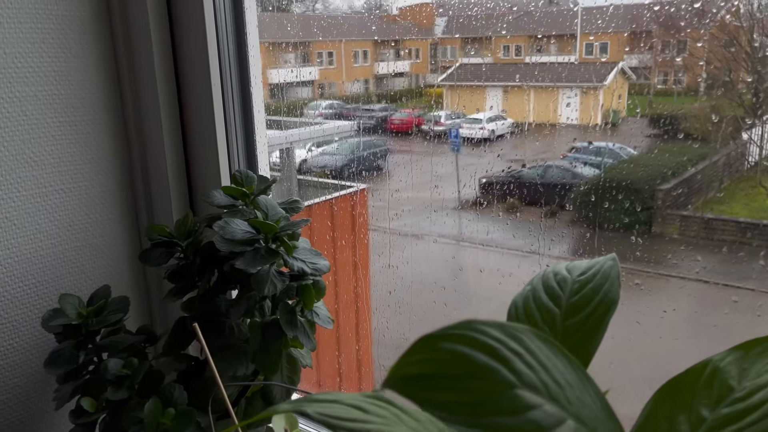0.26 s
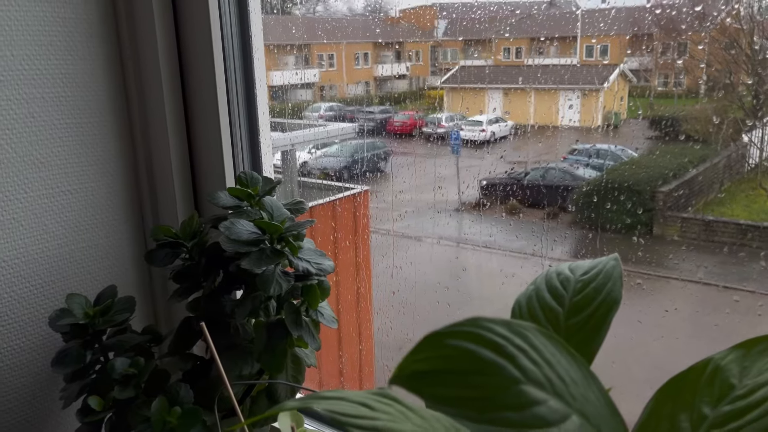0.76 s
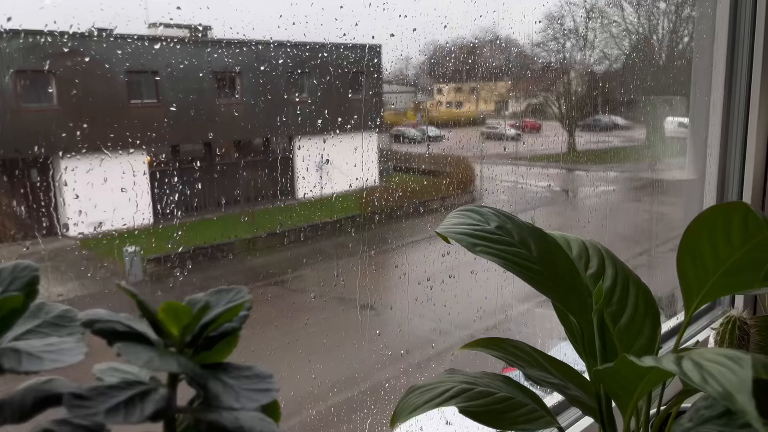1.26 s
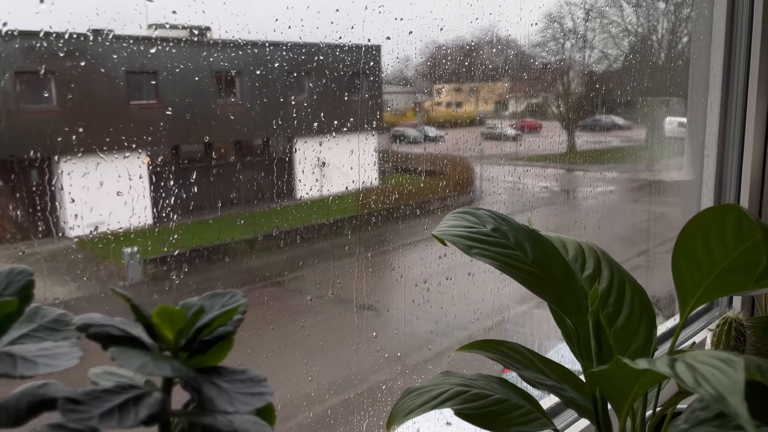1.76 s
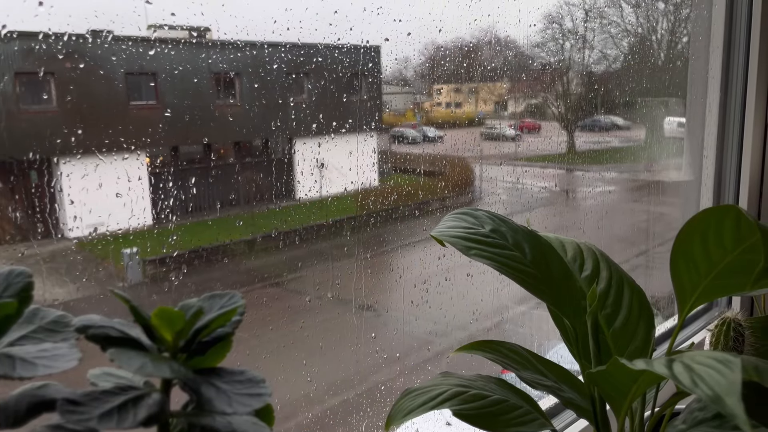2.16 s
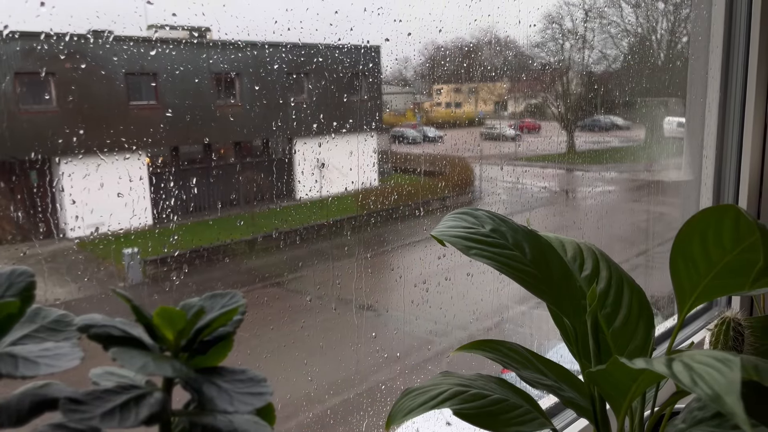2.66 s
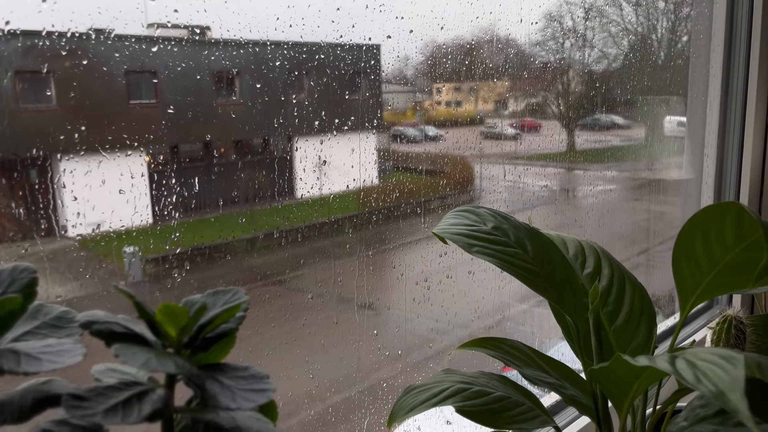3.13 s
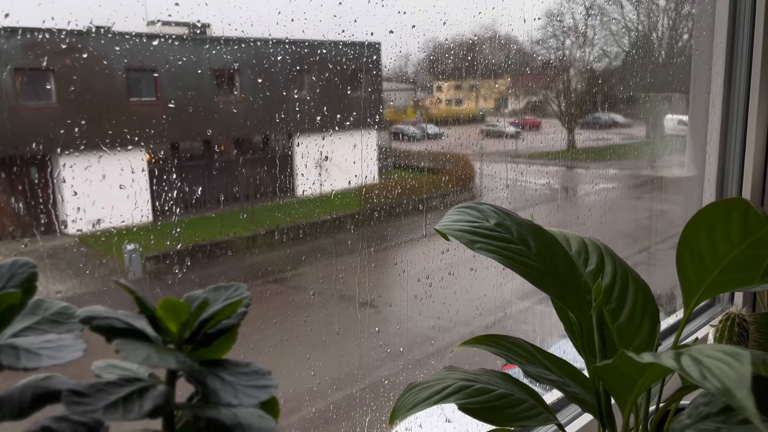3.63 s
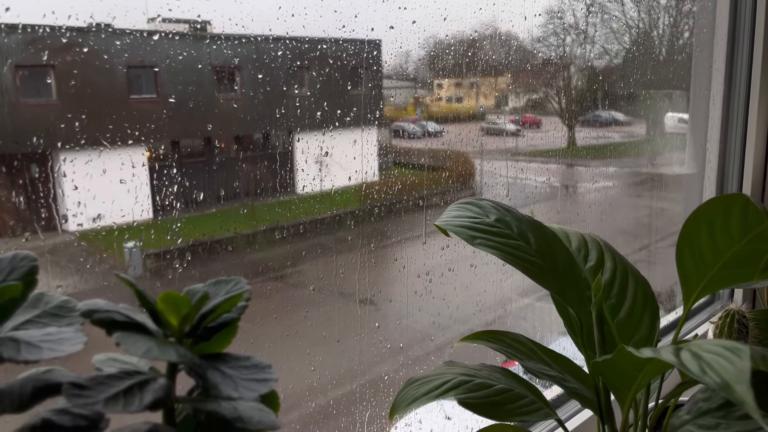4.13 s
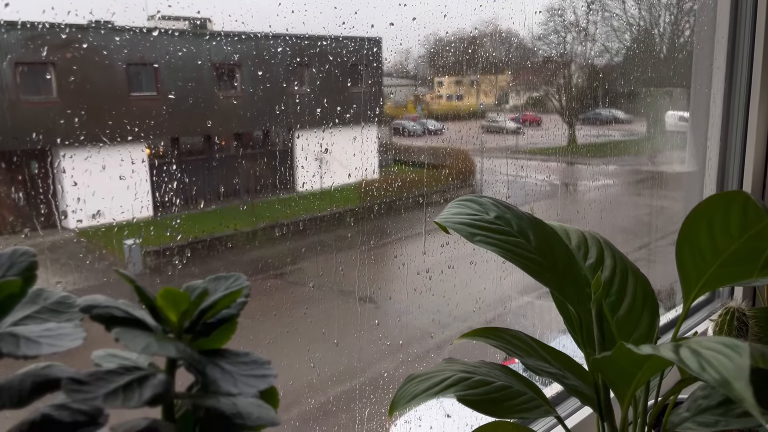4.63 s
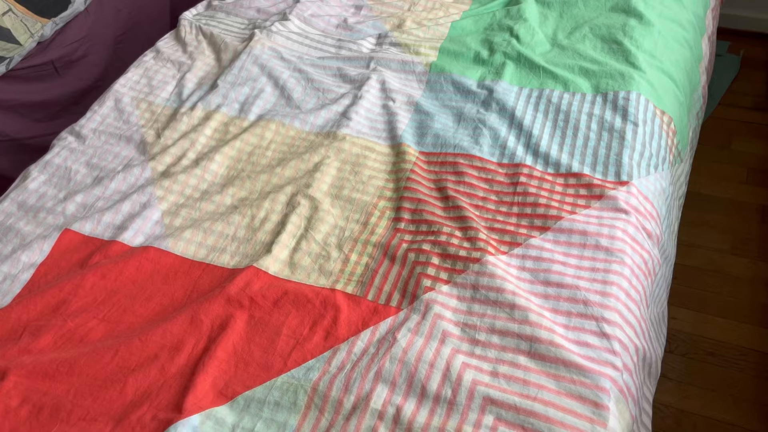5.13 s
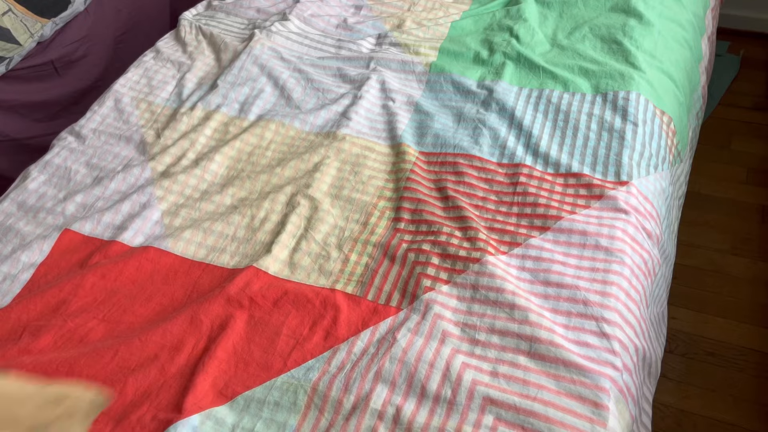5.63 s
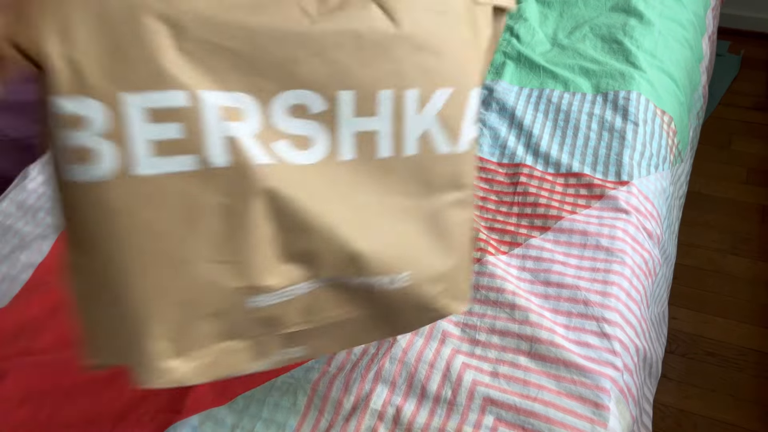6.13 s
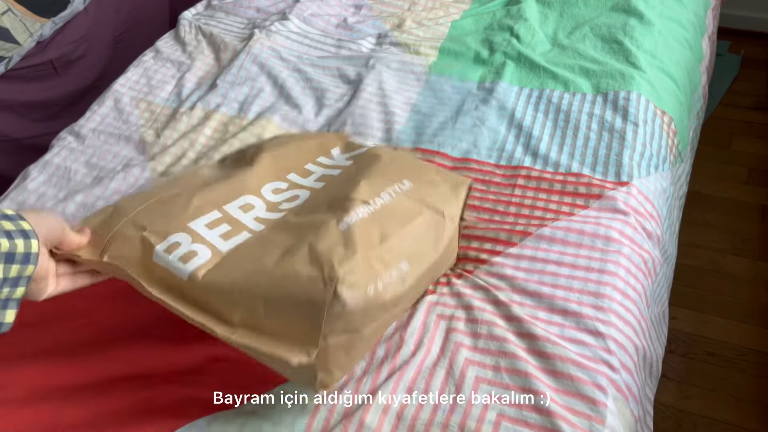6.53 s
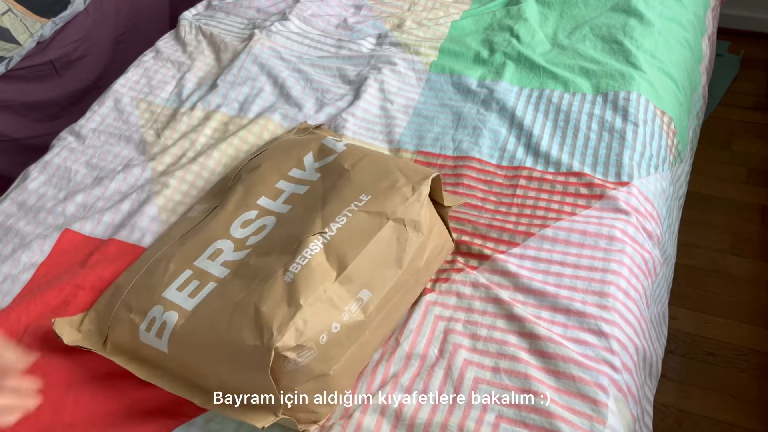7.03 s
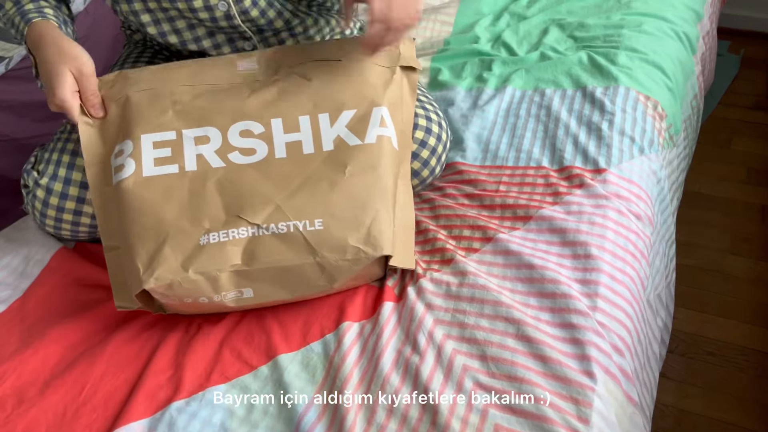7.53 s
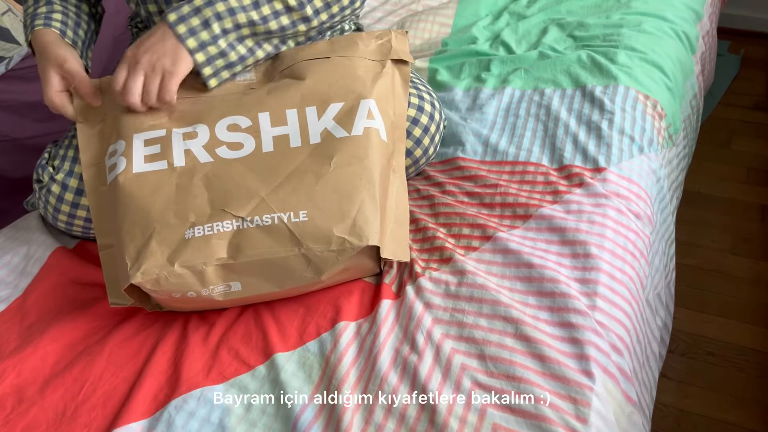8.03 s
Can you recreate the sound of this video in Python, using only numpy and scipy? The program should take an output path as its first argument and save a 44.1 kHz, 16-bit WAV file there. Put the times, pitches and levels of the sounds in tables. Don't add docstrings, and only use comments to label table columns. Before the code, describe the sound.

Indoors by a window, light drops tap the glass at uneven intervals, each a small tick with a dull knock and brief ring, over faint draught whistles, distant rain and low rumble. After about five seconds the rain gives way to a quiet bedroom, where a stiff paper parcel rustles, lands with a loud crackling burst, and is felt over with crisp pops. Close stereo microphone.

```python
import sys
import numpy as np
from scipy import signal
from scipy.fft import next_fast_len
from scipy.io import wavfile

SR = 44100
rng = np.random.default_rng(int(sys.argv[2]) if len(sys.argv) > 2 else 0)


def natural_amplitude(level_db):
    exponent = np.asarray(level_db, float) / 20
    return 10 ** exponent


def bounce(signal):
    frames = np.transpose(np.atleast_2d(signal))
    limited = np.clip(frames, -1, 1)
    pcm = np.round(limited * 32767).astype(np.int16)
    wavfile.write(sys.argv[1], SR, pcm)


N = 365148
SLOW = 40
SCENE_CHANGE_S = 7.295
IN_BEDROOM = slice(int(4.7 * SR), N)

# (time [s], peak [dB], bright patch [Hz], boom re peak [dB], boom pitch [Hz])
DROPS = [(0.413, -54, 2150, -19, 238), (0.446, -74, 2620, 25, 230), (0.55, -39, 1860, -8, 577),
         (0.758, -56, 1800, -20, 307), (0.856, -57, 1190, 0, 520), (0.962, -64, 870, 5, 500),
         (1.165, -74, 802, 11, 202), (1.519, -66, 1850, -16, 293), (1.64, -68, 1500, -5, 300),
         (1.727, -70, 1440, -8, 300), (1.846, -52, 990, 2, 554), (1.958, -62, 880, -4, 288),
         (2.103, -70, 1020, -5, 300), (2.422, -70, 1670, -8, 300), (2.464, -70, 1420, -8, 300),
         (2.674, -47.5, 1120, -1, 540), (3.041, -50, 1020, 4, 450), (3.098, -46.5, 1040, -3, 450),
         (3.218, -49.5, 891, 3.5, 442), (3.312, -49, 990, -1.5, 480), (3.519, -47, 961, -3, 445),
         (3.618, -68, 1740, -8, 300), (3.743, -66, 3060, -10, 300), (3.781, -43.5, 3700, -9.5, 456),
         (4.059, -63, 1670, -4, 203), (4.102, -69, 3610, -10, 300), (4.231, -42, 3940, -7.5, 232),
         (4.518, -47, 1920, 1, 480), (4.639, -63, 1120, -19, 223), (4.707, -70, 834, 11, 220),
         (4.804, -58, 850, 11.5, 325), (4.855, -43.5, 1380, -8, 304)]


def rms_one(x):
    return x / np.sqrt(np.mean(x ** 2) + 1e-20)


def at_hz(points, hz):
    points = np.array(points)
    return np.interp(np.log(hz), np.log(points[:, 0]), points[:, 1])


def hump(hz, centre_hz, db_per_octave):
    return natural_amplitude(-db_per_octave * np.abs(np.log2(hz / centre_hz)))


def notch(x, hz, width_hz):
    edges = [hz - width_hz / 2, hz + width_hz / 2]
    return signal.sosfilt(signal.butter(2, edges, "bandstop", fs=SR, output="sos"), x)


def drift(rate_hz):
    r = np.exp(-2 * np.pi * rate_hz * SLOW / SR)
    chance = rng.standard_normal(N // SLOW + 2002)
    settled = signal.lfilter([1], [1, -2 * r, r * r], chance)[2000:]
    return rms_one(settled)[:(N + SLOW - 1) // SLOW]


def full(slow):
    return np.interp(np.arange(N) / SLOW, np.arange(len(slow)), slow)


def peaked(s, db, rise_s, fall_s):
    t = np.arange(0, N, SLOW) / SR
    below_peak = np.maximum((s - t) / rise_s, (t - s) / fall_s)
    return natural_amplitude(2 * db - 20 * below_peak) * ((t < SCENE_CHANGE_S) == (s < SCENE_CHANGE_S))


def pair(alike):
    mid, own = rng.standard_normal((2, N))
    turned = -np.imag(signal.hilbert(mid, next_fast_len(N)))[:N]
    alike = np.clip(alike, 0, 1)
    return np.array([mid, alike * turned + np.sqrt(1 - alike ** 2) * own])


def bank(source, level, span=slice(0, None)):
    # (frequency [Hz], level [dB])
    width = [(60, -21), (200, -17), (400, -6.5), (1300, 1.5), (2400, -5.5), (4400, -3.5), (8000, 0),
             (15000, 18)]
    edges_hz = 22 * 2 ** np.arange(0, 9.6, .4)
    centres_hz = np.sqrt(edges_hz[1:] * edges_hz[:-1])
    out = np.zeros((2, N))
    for k, hz in enumerate(centres_hz):
        band = signal.butter(2, edges_hz[k:k + 2], "band", fs=SR, output="sos")
        to_unit_rms = np.sqrt(SR / 2 / (edges_hz[k + 1] - edges_hz[k]))
        gain = to_unit_rms * natural_amplitude([[0], [at_hz(width, hz)]])
        driven = source[:, span] * level(hz)[span] * gain
        out[:, span] += (-1) ** k * signal.sosfilt(band, driven + 1e-18)
    return out


def bursts(times, band_db, t60, hz, slope, late_cycles, tail_db, tail_s):
    envelope, kicks, t = np.zeros(N), np.zeros(N), np.arange(SR // 4) / SR
    rings = np.clip(t60, .004, .3) * (hz / 2000) ** -slope
    for s, db, ring in zip(times, band_db, rings):
        at = int((s + late_cycles / hz) * SR)
        span = t[:min(int(ring * SR), N - at)]
        attack = np.minimum(span / (0.048 * ring), 1)
        envelope[at:at + len(span)] += natural_amplitude(db - 60 * span / ring) * attack
        kicks[at] += natural_amplitude(db + tail_db)
    return envelope + signal.lfilter([1], [1, -natural_amplitude(-60 / (tail_s * SR))], kicks)


def resonant_noise(rows):
    out = np.zeros((2, N))
    for start, end, hz, width_hz, db in rows:
        t = np.arange(int(max(start - .02, 0) * SR), int(end * SR))
        r = np.exp(-np.pi * width_hz / SR)
        poles = [1, -2 * r * np.cos(2 * np.pi * hz / SR), r * r]
        once = signal.lfilter([1], poles, rng.standard_normal((2, SR // 2)))
        tone = signal.lfilter([1], poles, once)[:, -len(t):]
        fade = np.clip(np.minimum(t / SR - start + 0.016, end - t / SR) / .03, 0, 1)
        out[:, t] += natural_amplitude(db) * rms_one(tone) * fade * [[1], [.7]]
    return out


def mode_pairs(rows, db_re, t60, upper_db):
    out, t = np.zeros(N), np.arange(SR // 10) / SR
    for s, db, low_hz, high_hz in rows:
        both = np.sin(2 * np.pi * low_hz * t) + natural_amplitude(upper_db) * np.sin(2 * np.pi * high_hz * t)
        decay = natural_amplitude(db + db_re - 60 * t / t60) * np.minimum(t / .0012, 1)
        out[int(s * SR):int(s * SR) + len(t)] += decay * both
    return out * [[1], [.4]]


def air():
    # (frequency [Hz], density [dB per Hz])
    spectrum = [(15, -33), (25, -11.5), (53, 1.5), (114, -4.5), (256, -15), (384, -19), (451, -23),
                (796, -31.5), (2550, -39), (4030, -43), (6920, -53), (7920, -53), (11900, -56),
                (16000, -60)]
    # (from [s], deep rumble [dB], upper rumble [dB], far rain and room air [dB])
    places = [
        (0, -70, -74, -77),
        (0.987, -69, -74.5, -81),
        (4.95, -65.5, -75, -85),
        (7.295, -66, -67, -85),
    ]
    # (peak time [s], over steady air [dB], centre [Hz], fall per 10 dB [s])
    swells = [(0.04, 9, 500, .09), (0.08, 8, 80, .1), (0.51, 10, 130, .15), (0.7, 5, 3000, .5),
              (1.1, 6, 80, .1), (1.92, 8, 110, .2), (2.4, 6, 1600, .3), (3.17, 10, 200, .35),
              (3.8, 5, 150, .1), (4.61, 13, 3500, .07), (4.6, 11, 220, .1), (4.87, 20, 7500, .06),
              (5.62, 18, 250, .15), (5.8, 8, 500, .15), (6.31, 25, 170, .07), (6.5, 10, 200, .2),
              (6.72, 14, 120, .1), (6.9, 14, 100, .1), (7.16, 21, 200, .05), (7.32, 13, 100, .12),
              (7.64, 12, 60, .1), (7.77, 11, 120, .12), (7.87, 6, 300, .06), (8.1, 8, 140, .08)]
    places, centre_hz = np.array(places), np.array(swells)[:, 2]
    place = np.searchsorted(places[1:, 0] * SR, np.arange(0, N, SLOW))
    shapes = np.array([peaked(s, db, .8 * fall_s, fall_s) for s, db, _, fall_s in swells])

    def level(hz):
        above = np.interp(np.log(hz), np.log([350, 800]), [0, 1])
        below = np.interp(np.log(hz), np.log([100, 160]), [1, 0])
        db = (places[:, 1:] - [25.5, 18, 10]) @ [below, 1 - below - above, above]
        swell = np.sqrt(1 + hump(hz, centre_hz, 5.5) ** 2 @ shapes)
        unrest_db = (1.5 + 2.5 * (1 - above)) * drift(4.9)
        return full(swell * natural_amplitude(db[place] + at_hz(spectrum, hz) + 10 * np.log10(hz) + unrest_db))
    return bank(pair(0.94), level)


def draught():
    # (from [s], to [s], pitch [Hz], width [Hz], level [dB])
    whistles = [(0, .3, 1040, 40, -94), (.15, .42, 1250, 30, -89), (0, .15, 1710, 50, -86),
                (.03, .35, 2083, 40, -90), (0, .22, 2615, 40, -89), (.2, .45, 3494, 35, -96),
                (.66, .86, 1750, 25, -82), (.89, .99, 1750, 25, -81), (.43, .55, 2083, 30, -89),
                (.43, .55, 2615, 30, -90), (0, .08, 3150, 300, -90), (.62, .99, 2940, 35, -90),
                (.67, .83, 3910, 120, -84), (.67, .8, 3850, 600, -82), (.85, .99, 3950, 120, -82),
                (.68, .82, 5670, 40, -92), (.6, .99, 2630, 30, -92), (.86, .99, 4330, 200, -83),
                (.6, 1, 5400, 800, -91)]
    return resonant_noise(whistles)


def drops():
    # (frequency [Hz], level [dB])
    pane = [(120, -1.5), (300, 18.5), (600, -6), (1200, -14.5), (2500, -7), (4500, -8.5), (7000, -6.5),
            (12000, 11)]
    # (frequency [Hz], level [dB], t60 [s])
    glass = [(266, -4, 0.7), (1319, -42, 0.21), (1800, 2.5, 0.22), (1916, -4, 0.072), (2184, -29.5, 0.28),
             (2570, -6, 0.52), (2660, -35, 0.26), (3050, -16, 0.14), (3725, -0.5, 0.11), (5000, 0, 0.04)]
    s, db, patch_hz, boom, boom_hz = np.transpose(DROPS)
    splash = -26 + .4 * (db + 48)

    def level(hz):
        splash_db = np.interp(np.log(hz), np.log([5000, 9000]), [0, 1]) * splash
        tick = (hz > 600) * natural_amplitude(splash_db + at_hz(pane, hz)) * (1 + 1.12 * hump(hz, patch_hz, 33))
        band_db = db - 17.5 + 20 * np.log10(tick + natural_amplitude(boom + 7.5) * hump(hz, boom_hz, 10.9))
        return bursts(s - .0015, band_db, np.full(len(s), .115), hz,
                      slope=0.27, late_cycles=2.4, tail_db=-16, tail_s=0.41)
    out = bank(pair(0.21), level, slice(0, int(5.4 * SR)))
    spot = np.clip(rng.normal(0, 2.2, (len(s), len(glass))), -9, 4)
    for (hz, mode_db, ring_s), chance_db in zip(glass, spot.T):
        taps, w = np.zeros(N), 2 * np.pi * hz / SR
        r = natural_amplitude(-60 / (np.clip(ring_s, .02, .09) * SR))
        tap_db = db - 19.5 + 0.67 * mode_db + chance_db + (hz < 650) * boom
        taps[((s + .003) * SR).astype(int)] = natural_amplitude(tap_db)
        ringing = signal.lfilter([0, np.sin(w)], [1, -2 * r * np.cos(w), r * r], taps + 1e-18)
        out += ringing * [[1], [.4]]
    return out


def struck_spot():
    out, t = np.zeros(N), np.arange(SR // 8) / SR
    for s, db, patch_hz, boom, boom_hz in DROPS:
        ping = natural_amplitude(db - 12.5 - 60 * t / 0.052) * np.sin(2 * np.pi * patch_hz * t)
        build_up = 1 - np.exp(-t / 0.0055)
        knock = natural_amplitude(db + boom - 3.5 - 60 * t / 0.11) * build_up * np.sin(2 * np.pi * boom_hz * t)
        out[int(s * SR):int(s * SR) + len(t)] += ping + knock
    return out * [[1], [.3]]


def pane_pings():
    # (time [s], peak [dB], lower mode [Hz], upper mode [Hz])
    pings = [(0.5496, -49, 4050, 5300), (0.8554, -65, 4080, 4940), (1.8472, -57, 3620, 4410),
             (2.6728, -59, 3850, 4760), (3.0435, -58, 3140, 4410), (3.0984, -56, 2960, 5180),
             (3.2171, -60, 3640, 5070), (3.3139, -56, 3970, 4770), (3.5159, -54, 3640, 5180),
             (3.7833, -46, 3600, 5170), (4.2323, -48, 3930, 5170), (4.5196, -57, 3910, 4300),
             (4.8559, -53, 3930, 4790)]
    return mode_pairs(pings, -8.0, .06, -3.0)


def drags():
    # (from [s], to [s], pitch [Hz], width [Hz], level [dB])
    dragged = [(5.28, 5.46, 2200, 1000, -71), (5.5, 5.7, 1750, 250, -62), (5.62, 5.69, 4500, 2500, -60),
               (5.9, 6.1, 1800, 400, -73), (5.76, 5.98, 700, 300, -68), (6.83, 6.9, 4930, 300, -63),
               (6.82, 6.9, 2900, 900, -65), (7.1, 7.19, 3200, 2200, -59), (7.6, 7.66, 3400, 500, -64),
               (7.79, 7.83, 3100, 500, -52), (7.9, 7.95, 1800, 400, -54)]
    return resonant_noise(dragged)


def rustle():
    # (frequency [Hz], level [dB])
    paper = [(60, -16.5), (150, -3.5), (400, -5), (800, -1), (1600, -1), (3000, 2), (5000, 0.5), (7500, -2),
             (11000, 7), (15000, -24)]
    # (peak time [s], level [dB], rise per 10 dB [s], fall per 10 dB [s], hiss re stroke [dB])
    strokes = [(5.03, -89, .04, .5, 5), (5.29, -68.5, .09, .4, -9), (5.48, -60, .09, .12, -3),
               (5.64, -52, .06, .1, -18), (5.93, -63.5, .19, .6, -8), (6.31, -44, .12, .11, -11),
               (6.52, -57, .15, .09, -4), (6.68, -60, .1, .08, -2), (6.92, -51, .08, .045, -4),
               (7.12, -61, .03, .11, -11), (7.41, -59.5, .3, .4, -7), (7.78, -51, .2, .3, -17),
               (7.94, -54, .15, .15, -10), (8.17, -55, .06, .06, -9), (8.28, -56, .15, .2, -10)]
    low_body_db = [-2.5, 1.5]
    slide_lead_s = .035
    rustle_db = 10 * np.log10(sum(peaked(*row[:4]) for row in strokes))
    hiss = sum(peaked(s - slide_lead_s, db + slide_db, *slopes) for s, db, *slopes, slide_db in strokes)
    hiss_db = 10 * np.log10(hiss)
    body_db = rustle_db + np.where(np.arange(0, N, SLOW) < SCENE_CHANGE_S * SR, *low_body_db)
    born = rng.random(N) < 450 * full(natural_amplitude(6.0 * drift(20))) / SR
    sizes = born * natural_amplitude(3.1 * np.minimum(rng.exponential(1, N), 5))
    crackle = rms_one(signal.lfilter([1], [1, -.97], sizes))
    source = rms_one(pair(0.18) * (0.9 + 0.45 * crackle))

    def level(hz):
        share = np.interp(np.log(hz), np.log([1000, 2200]), [0, 1])
        db = hiss_db - 7.0 if hz > 8000 else (1 - share) * body_db + share * rustle_db - 12.5
        patch = 1 + 0.21 * (500 < hz < 8000) * np.roll(crackle, rng.integers(N))
        return full(natural_amplitude(db + at_hz(paper, hz) + 1.7 * drift(9.5))) * patch
    return bank(source, level, IN_BEDROOM)


def twangs():
    # (time [s], peak [dB], lower note [Hz], upper note [Hz])
    taut_notes = [(5.49, -29, 1840, 2260), (5.514, -38, 926, 2480), (5.562, -20, 1800, 2230),
                  (5.61, -27, 1740, 2280), (6.121, -19, 1950, 2410), (6.233, -35, 1810, 2080),
                  (6.244, -35, 1730, 3220), (6.423, -32, 980, 2010), (6.551, -35, 807, 2000),
                  (6.745, -38, 929, 2530), (6.844, -42, 1260, 4920), (6.901, -32, 1110, 2000),
                  (6.911, -31, 802, 2140), (6.927, -28, 1850, 2680), (6.983, -30, 1750, 2060),
                  (7.097, -32, 1670, 4720), (7.315, -37, 802, 2010), (7.337, -37, 929, 2050),
                  (7.601, -40, 977, 3490), (7.623, -41, 813, 3270), (7.645, -41, 805, 2530),
                  (7.692, -36, 802, 3180), (7.707, -34, 802, 2000), (7.734, -18, 810, 2800),
                  (7.769, -14, 1200, 4090), (7.884, -25, 1100, 2130), (8.035, -39, 1100, 2090),
                  (8.088, -25, 816, 2020), (8.149, -29, 818, 3080)]
    return mode_pairs(taut_notes, -13.0, .035, -1.0)


def snaps():
    # (time [s], peak [dB], centre [Hz], thump re
    # peak [dB])
    panel_pops = [(5.446, -40, 500, -14), (5.472, -42, 600, -10), (6.155, -48, 450, -4),
                  (5.515, -44, 900, -14), (5.625, -38, 900, -14), (6.121, -36, 1000, -20),
                  (6.232, -39, 1100, -8), (6.279, -18, 750, -11), (6.293, -24, 1000, -26),
                  (6.309, -15.5, 850, -9), (6.319, -23, 1040, -20), (6.342, -21.5, 754, -20),
                  (6.424, -34, 969, -26), (6.445, -38, 800, -21), (6.4625, -30, 800, -14),
                  (6.469, -33, 450, -16), (6.55, -29.5, 616, -20), (6.689, -44, 450, -4.5),
                  (6.743, -33, 700, -20), (6.843, -36, 700, -11), (6.899, -33, 900, -8),
                  (6.91, -26, 708, -25), (6.926, -37, 1410, -11), (6.981, -29, 900, -14),
                  (7.003, -35, 900, -14), (7.017, -38, 800, -14), (6.944, -35, 900, -14),
                  (7.138, -44, 947, -13),
                  (7.297, -41.5, 371, -11), (7.316, -35.5, 796, -10.5), (7.336, -35.5, 700, -33),
                 (7.599, -38.5, 900, -24), (7.634, -40, 980, -3.5), (7.69, -38, 1100, -16),
                 (7.705, -33.5, 770, -12), (7.732, -30, 950, -11.5), (7.759, -29, 1000, -15),
                 (7.798, -29, 1300, -20), (7.674, -40, 900, -15), (7.769, -21.5, 1200, -12),
                 (7.785, -26, 1400, -23), (7.885, -28, 1000, -20), (8.032, -38.5, 1100, -10),
                 (8.074, -43, 1240, -8), (8.087, -27, 900, -3), (8.147, -36.5, 780, -6)]
    # (time [s], peak [dB], centre [Hz], edge re peak [dB], crisp re peak [dB])
    crease_cracks = [(5.4906, -22.5, 2160, -40, -37), (5.5136, -37, 2000, -33, -25),
                     (5.5554, -29, 2200, -33, -35), (5.5618, -18, 2150, -14, -18),
                     (5.6096, -28.5, 1900, 2, -6), (5.7623, -44, 4600, -3, 22), (5.8558, -48, 2740, -13, -16),
                     (5.8728, -47, 2320, -15, -20), (5.96, -50, 1760, -20, -20), (6.07, -47, 2920, -15, -20),
                     (5.982, -50, 1830, -20, -14), (6.1212, -15, 2300, -20, -22), (6.243, -35, 1730, -3, -8),
                     (6.2823, -19, 2400, 0, -10), (6.2925, -16.5, 2000, -12, -31),
                     (6.3104, -13.5, 2300, -4, -6), (6.3335, -7, 2300, 7, 11), (6.3437, -22, 1900, -8, -36),
                     (6.5487, -33.5, 1710, -30, -22), (6.742, -41, 1760, -30, -17),
                     (6.8316, -47, 4400, -17, -13), (6.901, -39, 2900, -26, -20),
                     (6.9264, -29, 1850, -37, -34), (6.9822, -27, 1750, -24, -39),
                     (6.911, -32, 2100, -14, -35), (7.0965, -29, 3000, -2, 6),
                     (7.3135, -40, 1960, -14, -18), (7.3347, -42, 2050, -20, -27.5),
                   (7.379, -46, 1900, -17, -3), (7.6213, -43, 1890, -8, -16), (7.6454, -40, 2570, -15, -17),
                   (7.6919, -33, 3160, -28, -24), (7.712, -38, 1960, -19, -19),
                   (7.7277, -31, 1600, -19, -23), (7.7342, -21, 3400, -9, -16),
                   (7.7686, -14.5, 4800, -7, 11), (7.636, -42, 2100, -20, -25), (7.8, -36, 3100, -10, -25),
                   (7.85, -41, 2200, -20, -25), (7.788, -27, 2670, -33, -33), (7.884, -26, 1920, -2, -8),
                   (8.0878, -26.5, 1620, -18, -40), (8.149, -26, 2900, -20, -14)]
    s, db, centre_hz, thump = np.transpose(panel_pops)
    crack_s, crack_db, crack_hz, edge, crisp = np.transpose(crease_cracks)
    pop_t60 = np.full(len(s), .031)
    crack_t60 = .015 * (1 - .13 * (crisp + 20) / 10)

    def level(hz):
        pop = hump(hz, centre_hz, 10.7) + natural_amplitude(thump + 7) * hump(hz, 190, 9.6)
        crease = hump(hz, crack_hz, 14.7) + natural_amplitude(edge - 2) * hump(hz, 4100, 13.5)
        crease = crease + natural_amplitude(crisp) * hump(hz, 19300, 26)
        pops = bursts(s, db - 14.5 + 20 * np.log10(pop), pop_t60, hz,
                      slope=0.23, late_cycles=-0.7, tail_db=-15, tail_s=0.34)
        cracks = bursts(crack_s, crack_db - 13.0 + 20 * np.log10(crease), crack_t60, hz,
                        slope=0.38, late_cycles=0.3, tail_db=-23, tail_s=0.24)
        return pops + cracks
    source = pair(0.62)
    source[:, ((crack_s + .0008) * SR).astype(int)] = 4.5 * np.array([[1], [.3]])
    return bank(source, level, IN_BEDROOM)


def scene():
    window = drops() + struck_spot() + pane_pings() + draught()
    parcel = snaps() + twangs() + rustle() + drags()
    mid, side = window + parcel + air()
    return np.array([mid + side, mid - side])


def stereo_colour(mid, side, colour, sheen_db):
    notch_hz, top_hz, side_notch_hz = colour
    treble = signal.sosfilt(signal.butter(1, [13000, 16500], "band", fs=SR, output="sos"), mid)
    mid = notch(mid + natural_amplitude(sheen_db) * treble, notch_hz, 0.24 * notch_hz)
    under = signal.sosfilt(signal.cheby1(6, 1, top_hz, fs=SR, output="sos"), mid)
    side = notch(side, side_notch_hz, 3600)
    side = signal.sosfilt(signal.cheby1(6, 1, 15900, fs=SR, output="sos"), side)
    return np.array([under + 0.07 * mid, side])


def band_limit(x):
    return signal.sosfilt(signal.butter(12, 16670, fs=SR, output="sos"), x)


def record(dry):
    # (sum notch [Hz], sum top [Hz], difference notch [Hz])
    colours = [
        (8400, 14500, 12100),
        (9150, 15800, 13100),
    ]
    sheen_db = [2, 11]
    mid, side = (dry[0] + dry[1]) / 2, (dry[0] - dry[1]) / 2
    side = side + .24 * signal.sosfilt(signal.butter(1, [70, 8000], "band", fs=SR, output="sos"), mid)
    before, after = (stereo_colour(mid, side, colour, db) for colour, db in zip(colours, sheen_db))
    mid, side = np.where(np.arange(N) < SCENE_CHANGE_S * SR, before, after)
    return band_limit(np.array([mid + side, mid - side]))


dry = scene()
out = record(dry)
bounce(out)
```